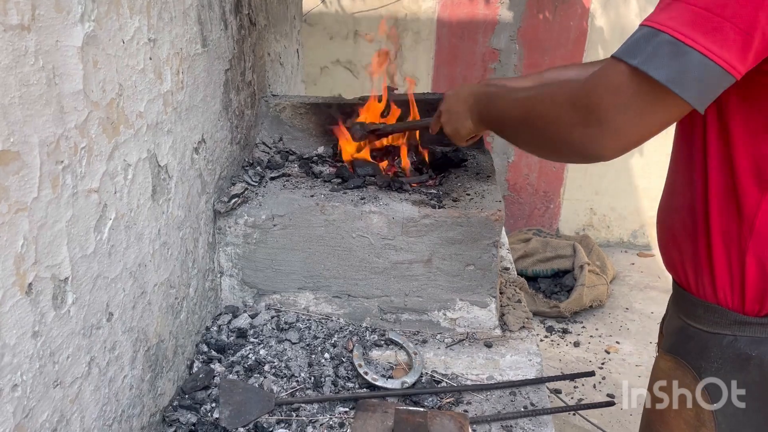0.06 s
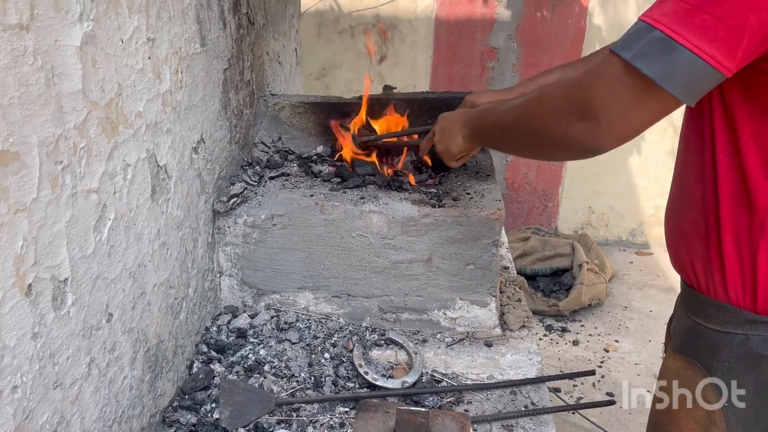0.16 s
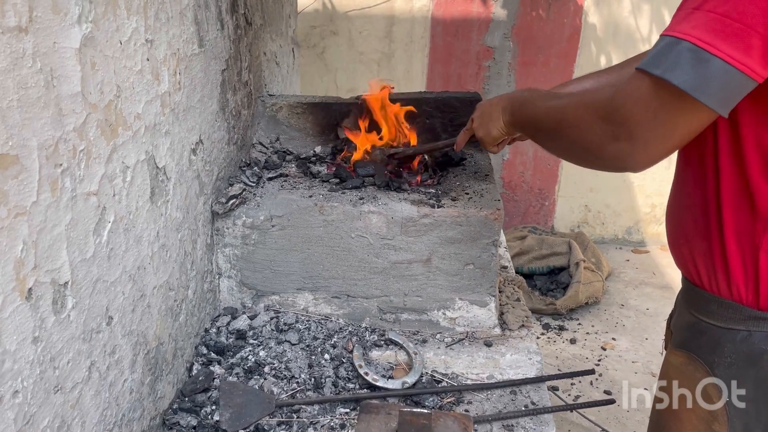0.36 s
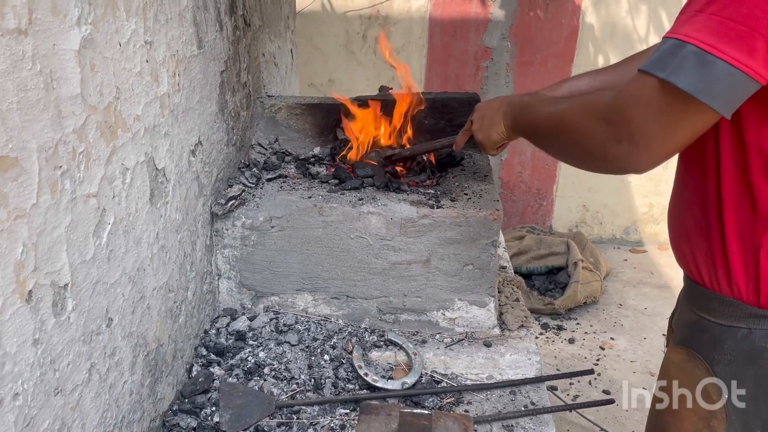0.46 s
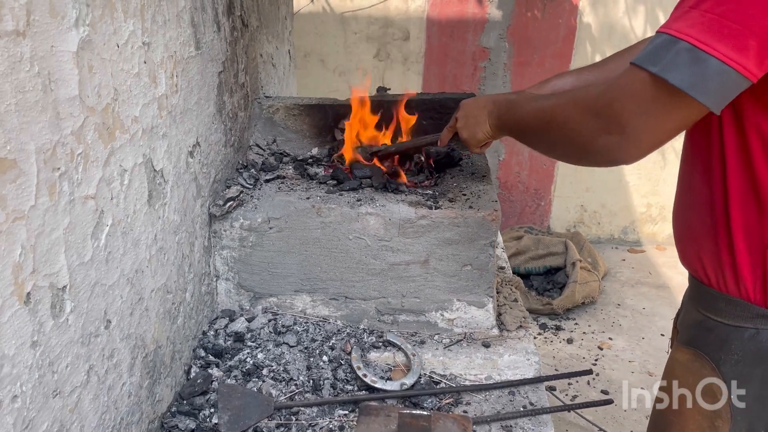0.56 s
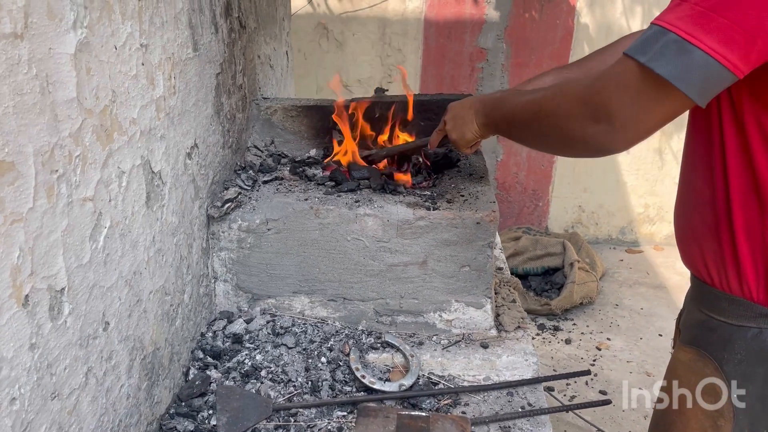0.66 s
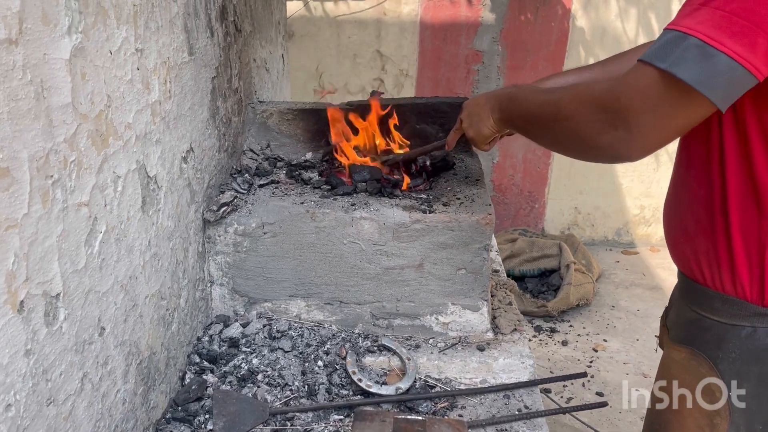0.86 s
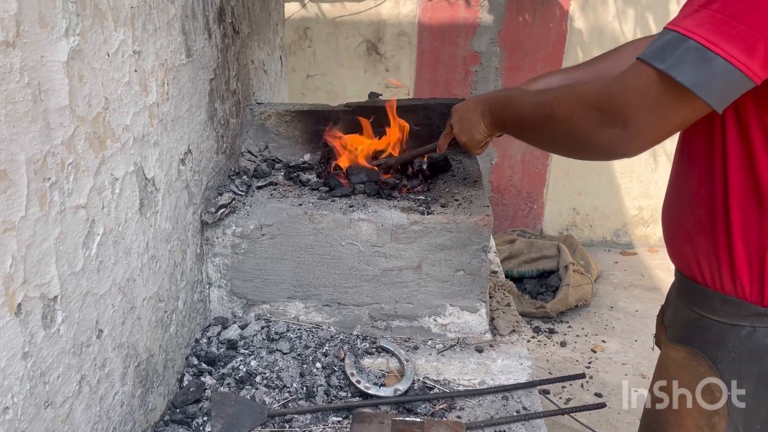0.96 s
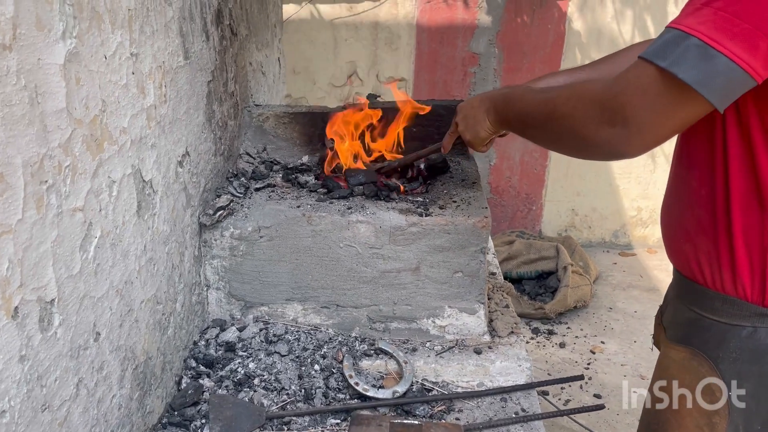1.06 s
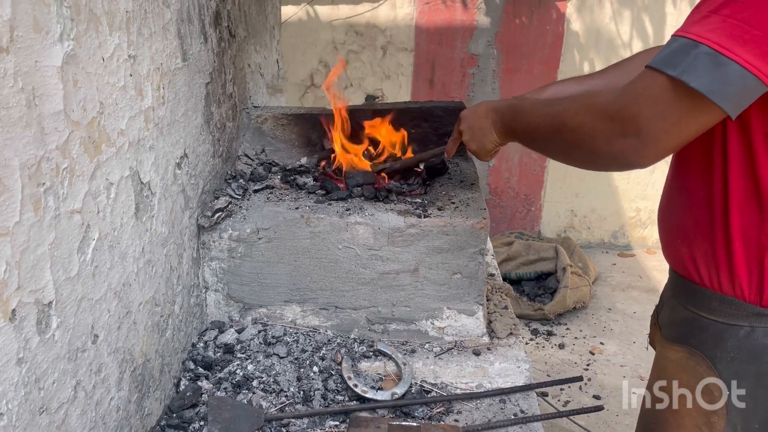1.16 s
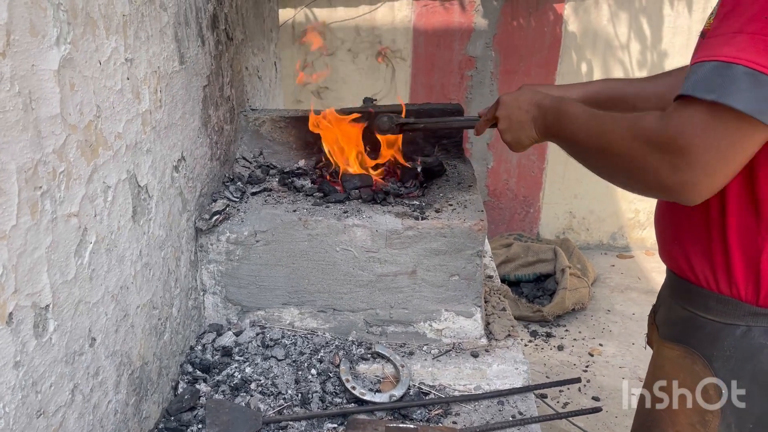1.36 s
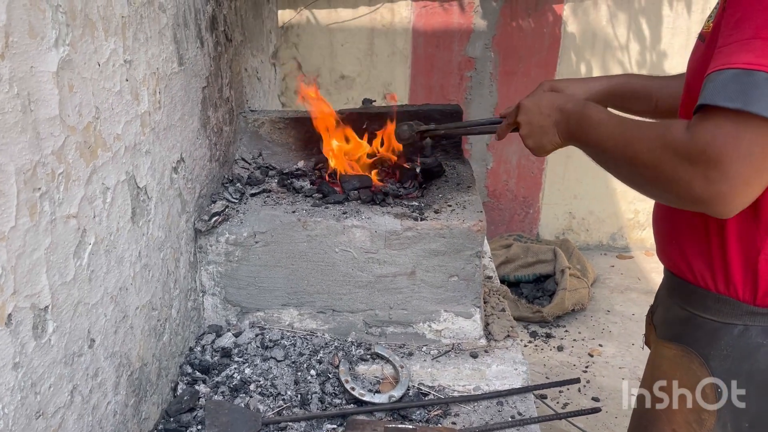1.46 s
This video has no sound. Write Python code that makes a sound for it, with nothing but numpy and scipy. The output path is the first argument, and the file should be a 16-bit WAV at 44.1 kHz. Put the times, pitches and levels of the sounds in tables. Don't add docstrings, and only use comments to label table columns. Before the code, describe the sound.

Iron tongs work a coal fire over a low unsteady blower hum. At 0.09 s a light tap and coal ticks, then gritty scraping and dull thuds from 0.2 s. A bright, quickly gripped clink dominates at 0.33 s, with a faint rebound at 0.46 s. Raking resumes around 0.55 s, thudding and rumbling at 0.75-1.04 s. Soft taps at 1.21 and 1.29 s end among crackles and faint fizz.

```python
import sys
import numpy as np
from scipy import signal
from scipy.fft import rfft, irfft, next_fast_len
from scipy.io import wavfile
from scipy.ndimage import uniform_filter1d, map_coordinates

SR = 44100
rng = np.random.default_rng(int(sys.argv[2]) if len(sys.argv) > 2 else 0)


def nominal_scale(level):
    x = np.asarray(level, float) / 20
    return 10 ** x


def unload_audio(sound):
    columns = np.transpose(np.atleast_2d(sound))
    steps = np.round(np.clip(columns, -1, 1) * 32767)
    wavfile.write(sys.argv[1], SR, steps.astype(np.int16))


N = 66150

HORSESHOE_HZ = [1889, 2385, 2625, 3288, 3730, 4490, 4995, 6640, 6862, 8715, 9650, 11030, 11570, 13400]


def unit(x):
    return x / np.sqrt(np.mean(x ** 2) + 1e-20)


def along(points, hz):
    f, v = np.transpose(points)
    return np.interp(np.log(hz + 1), np.log(f + 1), v)


def wobble(rate):
    knots = rng.standard_normal(int(N * rate / SR) + 4)
    return map_coordinates(knots, [np.arange(N) * rate / SR])


def filtered(x, response):
    m = next_fast_len(N + SR // 4)
    return irfft(rfft(x, m) * response(np.fft.rfftfreq(m, 1 / SR)), m)[..., :N]


def rush(spectrum, source):
    # (frequency [Hz], correlation)
    likeness = [(60, .998), (250, 0.94), (500, 0.64), (900, 0.47), (2200, 0.31), (3700, 0.46), (5500, 0.8),
                (8000, 0.9), (15000, 0.68)]

    def mid_and_side(hz):
        turn = np.arccos(np.clip(along(likeness, hz), -1, 1)) / 2
        return nominal_scale(along(spectrum, hz)) * [np.cos(turn), np.sin(turn)]

    mid, side = filtered(source, mid_and_side)
    return unit(np.array([mid + side, mid - side]))


def add(track, s, sound):
    part = track[round(s * SR):][:len(sound)]
    part += sound[:len(part)]


def strikes(events, pitches, modes):
    sag_db_per_s, damped_t60_s = 500, 0.021
    free_db, wander_rad = -20.5, .15
    hash_db, hash_t60_s = -20, .22
    contact_rise_s, chatter_db = .0006, 1.23
    crack_band = signal.butter(2, [3480, 11500], "band", fs=SR, output="sos")
    out, t = np.zeros(N), np.arange(SR // 4) / SR
    hz = np.c_[pitches]
    t60, *levels = np.transpose(modes)[:, :, None]
    for (s, db, contact, crack_db), level in zip(events, levels):
        rattle = uniform_filter1d(rng.standard_normal((len(hz), len(t))), size=160, axis=1)
        chatter = nominal_scale(chatter_db * unit(rattle))
        held = np.clip(t - contact, 0, None)
        grip = nominal_scale(2.5 - sag_db_per_s * np.minimum(t, contact) - 60 * held / damped_t60_s)
        turn = 2 * np.pi * (hz * t + rng.random(hz.shape))
        drift = wander_rad * np.cumsum(rng.standard_normal(chatter.shape), axis=1)
        free = nominal_scale(free_db - 60 * t / t60) * np.sin(turn + drift)
        ring = (nominal_scale(level) * chatter * (grip * np.sin(turn) + free)).sum(0)
        crack = signal.sosfilt(crack_band, rng.standard_normal(len(t)))
        crack *= nominal_scale(crack_db) * (grip + nominal_scale(hash_db - 60 * t / hash_t60_s))
        add(out, s, nominal_scale(db - 11.5) * (ring + crack) * (1 - np.exp(-t / contact_rise_s)))
    return out


def rake():
    # (time [s], length [s], level [dB], rise [s], fall t60 [s])
    strokes = [(0.078, 0.022, -61.5, 0.0098, 0.23), (0.173, 0.18, -63.5, 0.018, 0.074),
               (0.234, 0.038, -67.5, 0.0014, 0.022), (0.31, 0.16, -74, .005, 0.21),
               (0.551, 0.084, -65, 0.055, 0.029), (0.631, 0.19, -65.5, 0.1, 0.24),
               (0.872, 0.077, -71.5, 0.041, 0.51), (1.014, 0.061, -65, 0.021, 0.19),
               (1.096, .018, -81, 0.0059, 0.041), (1.145, 0.044, -80, 0.0055, 0.15),
               (0.084, 1.41, -81.5, 0.011, 0.66)]
    # (time [s], level [dB])
    shove = [(0.0, -79), (0.066, -85.5), (0.1, -71), (0.136, -78), (0.266, -60.5), (0.324, -70.5),
             (0.334, -62.5), (0.366, -73), (0.526, -82.5), (0.63, -66.5), (0.676, -72), (0.688, -66),
             (0.806, -61.5), (0.87, -73), (.93, -66.5), (1.076, -70.5), (1.144, -77), (1.5, -86)]
    # (frequency [Hz], level [dB per Hz])
    grit_spectrum = [(500, -11), (900, 3), (2500, -1), (5000, -1.5), (7000, -1.5), (11500, -3.5),
                     (15000, -8.5), (15800, -8.5)]
    # (frequency [Hz], level [dB per Hz])
    bed_spectrum = [(47, -47), (80, -5), (183, -5), (281, -13), (395, -21), (463, -22.5), (658, -19.5),
                    (979, -35), (1200, -39), (1560, -64), (2640, -120)]
    sings_db, rumble_db = -5.5, 12.5
    mode_width_hz = 160
    t = np.arange(N) / SR
    s, length, db, rise, fall = np.transpose(strokes)[:, :, None]
    release = nominal_scale(db - 60 * np.clip(t - s - length, 0, None) / fall)
    press = (release * np.clip((t - s) / rise, 0, 1)).sum(0)
    grains = rng.standard_normal((2, N)) * nominal_scale(1.5 * wobble(1500) + 0.84 * wobble(90.4))

    def singing_iron(f):
        damping = 1j * f * mode_width_hz
        return 1 + nominal_scale(sings_db) * sum(damping / (c * c - f * f + damping) for c in HORSESHOE_HZ)

    scrape = unit(filtered(rush(grit_spectrum, grains), singing_iron)) * press
    bed = rush(bed_spectrum, rng.standard_normal((2, N)) * nominal_scale(1.87 * wobble(49.54)))
    return scrape + bed * nominal_scale(np.interp(t, *np.transpose(shove)) + rumble_db)


def thuds():
    # (time [s], peak [dB], pitch [Hz], t60 [s])
    pushes = [(0.2, -44, 218, 0.048), (0.28, -41.5, 169, 0.13), (0.3, -35, 182, 0.039),
              (0.34, -32, 158, 0.05), (0.34, -41.5, 273, 0.049), (0.33, -55, 535, 0.041),
              (.094, -64, 800, 0.065), (0.23, -48, 132, 0.16), (0.75, -45, 151, 0.17),
              (0.79, -41.5, 164, 0.12), (0.82, -33.5, 184, 0.041), (0.911, -44.5, 154, 0.093),
              (0.929, -43, 188, 0.12), (0.95, -37, 220, 0.036), (1.04, -49, 190, 0.1),
              (0.86, -53, 270, 0.074), (.62, -58, 290, 0.059), (.94, -59, 420, 0.053),
              (0.39, -53.5, 216, 0.069)]
    rise_s = 0.0027
    out, t = np.zeros(N), np.arange(SR // 4) / SR
    for s, db, hz, t60 in pushes:
        swell = nominal_scale(db + 5.5 - 60 * t / t60) * (1 - np.exp(-t / rise_s))
        add(out, s, swell * np.sin(2 * np.pi * hz * t))
    return out


def ticks():
    # (time [s], peak [dB], t60 [s], brightness [dB per octave])
    snaps = [(0.0862, -56, 0.025, -6), (0.0938, -50, 0.015, -5.5), (.104, -61, 0.014, -4),
             (.164, -68, .01, 5), (0.171, -56, 0.014, -0.5), (0.1968, -57, 0.012, 9),
             (0.239, -49, 0.018, -3), (0.541, -54, 0.0041, 1.5), (1.196, -73, .01, 5),
             (1.206, -67, 0.0094, 0.5), (1.237, -70, 0.01, -5), (1.252, -75, 0.008, 2),
             (1.266, -75, .01, -2), (1.2129, -62, 0.011, -7), (1.276, -78, .015, 4),
             (1.284, -67, 0.014, -7), (1.29, -67, .006, 4), (1.3013, -61, 0.018, -4),
             (1.3065, -58.5, 0.014, -3), (1.3104, -70, 0.015, 2), (1.3164, -61.5, 0.0074, 0),
             (1.369, -65, 0.0072, 0), (1.3752, -60.5, 0.013, -3.5), (1.384, -72, 0.019, -3),
             (1.4013, -67, 0.012, -0.5), (1.4262, -58.5, 0.01, -4.5), (1.44, -75, 0.013, -3),
             (1.45, -70, 0.012, -1)]
    # (frequency [Hz], level [dB])
    snap_colour = [(1000, -7), (3000, -5), (6000, 2.5), (10000, 8), (14000, -4), (15700, 10)]
    apart_db = -9.5
    lead_in = 64
    out, t = np.zeros((2, N)), np.arange(SR // 10) / SR
    hz = np.fft.rfftfreq(len(t) * 2, 1 / SR)
    delay = np.exp(-2j * np.pi * hz * lead_in / SR)
    for s, db, t60, tilt_db in snaps:
        shared, apart = nominal_scale(db - 60 * t / t60) * rng.standard_normal((2, len(t)))
        tilt = tilt_db * np.log2(hz / 7000 + .05)
        colour = nominal_scale(along(snap_colour, hz) + tilt) * delay
        for port, sign in zip(out, (1, -1)):
            puff = shared + sign * nominal_scale(apart_db) * apart
            add(port, s - lead_in / SR, irfft(rfft(puff, len(t) * 2) * colour))
    return out


def grazes():
    # (time [s], length [s], level [dB], resonance [Hz])
    slips = [
        (0.191, 0.017, -69, 2400),
        (0.235, 0.039, -69.5, 2600),
        (0.246, 0.037, -66.5, 4600),
        (.745, 0.085, -70.5, 2420),
        (0.898, 0.095, -77, 5100),
        (1.035, 0.013, -69.5, 2500),
        (1.073, 0.018, -72.5, 2597),
        (1.1, 0.024, -72, 3950),
        (1.153, 0.02, -81.5, 4200),
        (1.298, 0.015, -72, 4970),
    ]
    width_hz = 370
    out, n = np.zeros(N), SR // 8
    for s, length, db, hz in slips:
        roughness = unit(uniform_filter1d(rng.standard_normal(n), size=120))
        grit = rng.standard_normal(n) * nominal_scale(3.3 * roughness)
        band = signal.butter(2, [hz - width_hz / 2, hz + width_hz / 2], "band", fs=SR, output="sos")
        u = np.clip(np.arange(n) / SR / length, 0, 1)
        arch = np.sqrt(abs(np.sin(np.pi * u))) * (u < 1)
        add(out, s, nominal_scale(db + 2) * unit(signal.sosfilt(band, grit)) * arch)
    return out


def embers():
    # (frequency [Hz], level [dB per Hz])
    fizz_spectrum = [(1500, -15.5), (4000, 0), (8000, 3.5), (12000, 3.5), (15700, 0.5)]
    # (time [s], level [dB])
    fizz_level = [(0.069, -110), (.09, -79), (1.1, -97), (1.25, -75.5), (1.5, -80.5)]
    apart_db = -10
    shared, apart = rng.standard_normal((2, N)) * nominal_scale(5 * wobble(500) + 3.3 * wobble(55))
    fizz = shared + nominal_scale(apart_db) * np.outer([1, -1], apart)
    fizz = unit(filtered(fizz, lambda hz: nominal_scale(along(fizz_spectrum, hz))))
    return fizz * nominal_scale(np.interp(np.arange(N) / SR, *np.transpose(fizz_level)))


def blower():
    # (time [s], level [dB])
    hum_level = [(0.0, -78), (0.033, -51.5), (0.108, -67.5), (0.142, -54), (0.496, -55), (0.638, -68),
                 (0.672, -60), (0.876, -64), (1.006, -56), (1.036, -64), (1.156, -62), (1.21, -67),
                 (1.256, -59.5), (1.5, -65)]
    # (frequency [Hz], level [dB per Hz])
    air_spectrum = [(30, -12), (65, 1), (110, -3.5), (300, -27.5), (1200, -33), (5000, -42.5), (11500, -45),
                    (15500, -65)]
    hum_hz, air_db = 64.5, -63
    phase = 2 * np.pi * np.cumsum(hum_hz * (1 + 0.032 * wobble(11.6))) / SR
    level = np.interp(np.arange(N) / SR, *np.transpose(hum_level)) + 0.41 * wobble(19)
    hum = nominal_scale(level) * np.sqrt(2) * np.sin(phase)
    return hum + nominal_scale(air_db) * rush(air_spectrum, rng.standard_normal((2, N)))


def walls(x):
    room_t60_s = .16
    t = np.arange(SR // 4) / SR
    tail = rng.standard_normal((2, len(t))) * nominal_scale(-60 * t / room_t60_s)
    tail /= np.linalg.norm(tail[0])
    return signal.fftconvolve(np.pad(x, (150, 0))[None], tail, axes=1)[:, :N]


def scene():
    # (time [s], peak [dB], contact [s], crack [dB])
    clinks = [
        (.3307, -19.5, 0.005, -0.5),
        (.4646, -40.5, 0.0044, 2.5),
    ]
    taps = [
        (.0865, -50.5, 0.013, -5),
        (1.2057, -55.5, 0.0098, -16),
        (1.2903, -48, 0.0056, -8.5),
    ]
    # (t60 [s], level at the blow [dB], level at the rebound [dB])
    horseshoe = [(0.14, -20, -3), (0.098, -13, -9.5), (0.43, -17, -0.5), (.16, -13, -2), (0.33, -9, -20),
                 (0.2, -6.5, -4.5), (0.35, -3.5, -3), (0.6, -10.5, -9), (0.37, -5, 1), (.16, -4.5, -8),
                 (0.095, -1, -0.5), (0.3, -1.5, -22), (0.17, -7.5, -25), (0.096, -11, -22),
                 (0.17, -20, -14), (0.55, -21, -12), (0.35, -14, -29), (0.54, -8.5, -19), (0.083, -6, -16),
               (.15, -7, -16), (0.43, -15, -30), (0.091, -30, -32), (.06, -8, -18), (.03, -18, -38)]
    further_hz = [4760, 5710, 2735, 7188, 9890, 10300, 11250, 12200, 13880, 15400]
    # (t60 [s], level at each of the three taps [dB])
    tong_jaws = [(.08, -5, -9, -14), (0.095, -7, -5, -7), (0.058, -16, 0, -9), (.06, -3, -14, 2),
                 (0.046, -12, -9, -13), (.08, -25, -5, -10.5), (.06, -23, -11, -28), (0.15, -1, -8, -3),
                 (0.034, 4.5, -18, -16), (.05, -21, -14, -5), (.04, -7, -26, -29), (.04, -4, -27, -20),
                 (.04, -12, -10, -17), (.04, -7, -12, -24)]
    tong_jaws_hz = [1960, 2450, 2650, 3160, 3700, 4180, 4440, 4910, 5510, 5650, 6260, 6700, 8900, 10300]
    room_db = -21
    iron = strikes(clinks, [*HORSESHOE_HZ, *further_hz], horseshoe)
    iron = iron + strikes(taps, tong_jaws_hz, tong_jaws)
    coal = ticks()
    room = nominal_scale(room_db) * walls(iron + coal[0])
    return iron + coal + room + rake() + thuds() + grazes() + embers() + blower()


def drop_weaker(x):
    weaker_db, sudden_db, bass_hz = -8, 2, 3000
    hz, _, z = signal.stft([x[0] + x[1], x[0] - x[1]], SR, nperseg=1024)
    power = uniform_filter1d(abs(z) ** 2, size=14, axis=1)
    power = uniform_filter1d(power, size=5, axis=2)
    treble = (abs(z[:, hz > bass_hz]) ** 2).sum((0, 1))
    sudden = treble > uniform_filter1d(treble, size=5) * nominal_scale(sudden_db)
    strong = power > power[::-1] * nominal_scale(2 * weaker_db)
    keep = strong | (hz < bass_hz)[:, None] | sudden
    mid, side = signal.istft(z * keep, SR, nperseg=1024)[1][:, :N] / 2
    return np.array([mid + side, mid - side])


def roll_off(x):
    return signal.sosfilt(signal.butter(12, 15780, fs=SR, output="sos"), x)


def record(dry):
    # (frequency [Hz], phase [radians])
    left_lead = [(690, .4), (2700, .7), (3700, 0), (5000, .9), (5900, .3), (8100, -3.14), (11750, -6.28),
                 (14700, -9.42), (15100, -9.42), (15500, -10.05)]
    left_db, top_hz = .6, 15790
    sides = np.array([[1], [-1]])

    def ports(hz):
        lead = along(left_lead, hz) * np.clip(hz / left_lead[0][0], 0, 1)
        return np.exp(.5j * lead * sides) * nominal_scale(left_db / 2 * sides) * (hz < top_hz)

    mix = drop_weaker(filtered(dry, ports))
    return roll_off(mix)


dry = scene()
out = record(dry)
unload_audio(out)
```